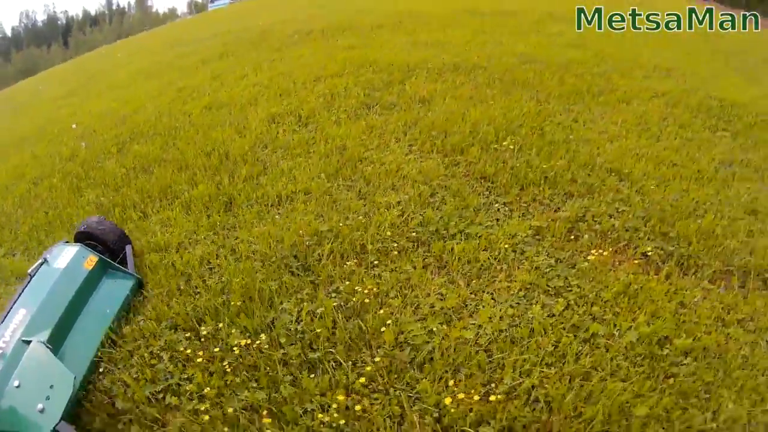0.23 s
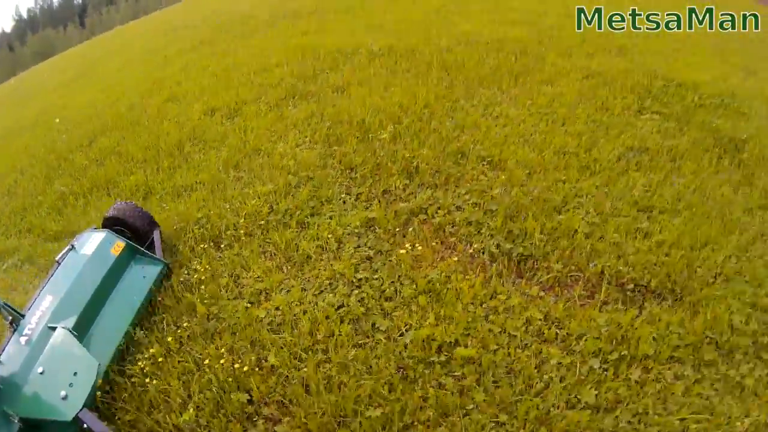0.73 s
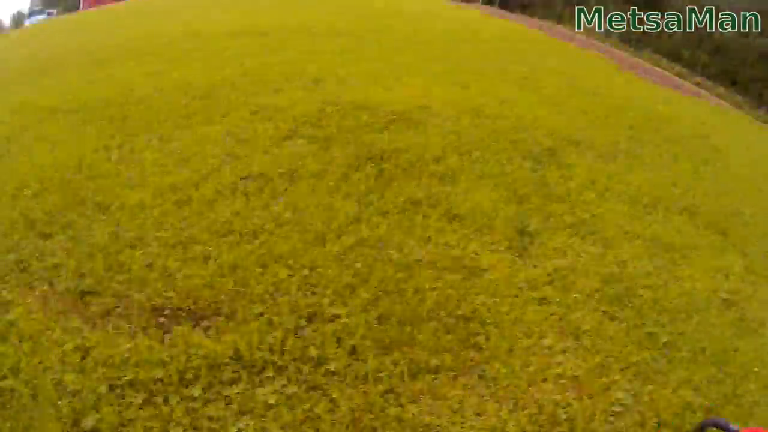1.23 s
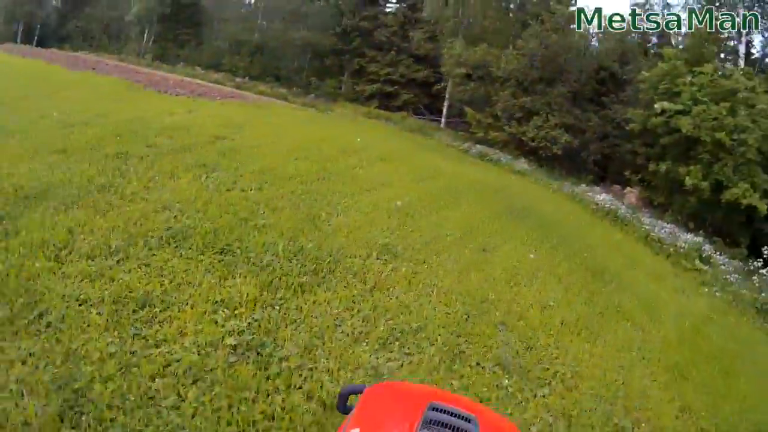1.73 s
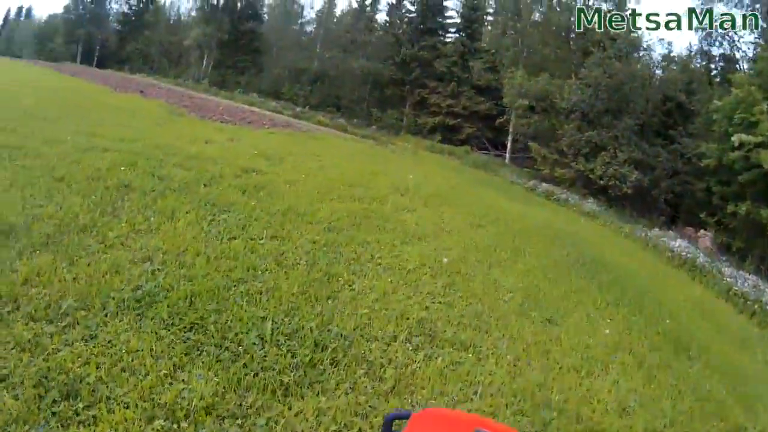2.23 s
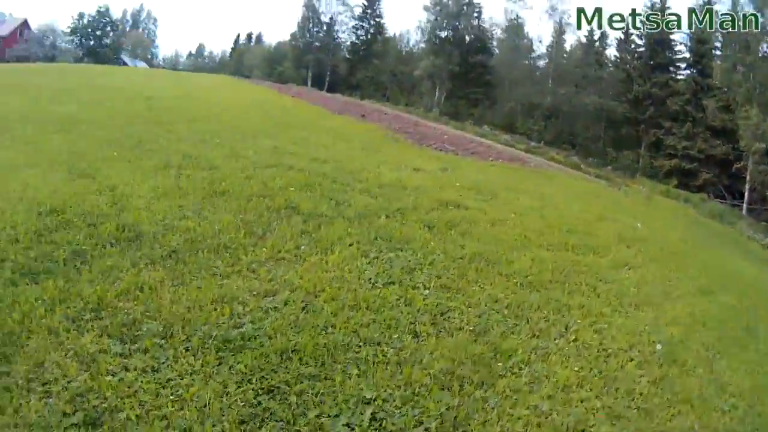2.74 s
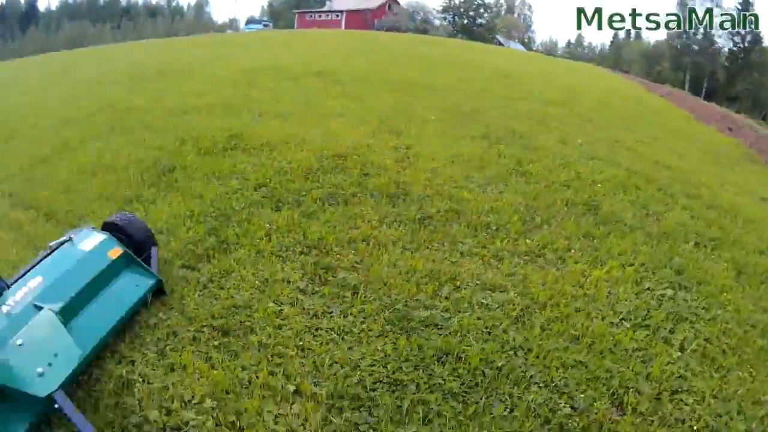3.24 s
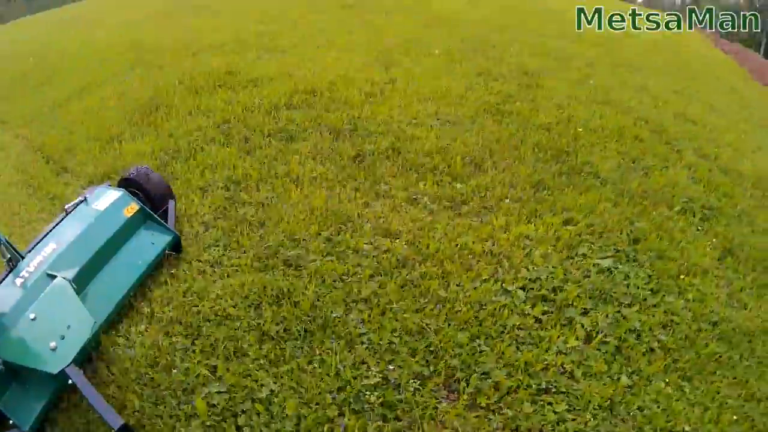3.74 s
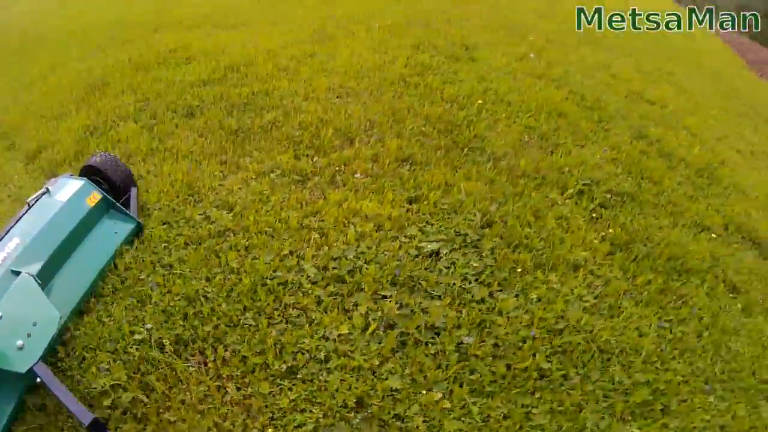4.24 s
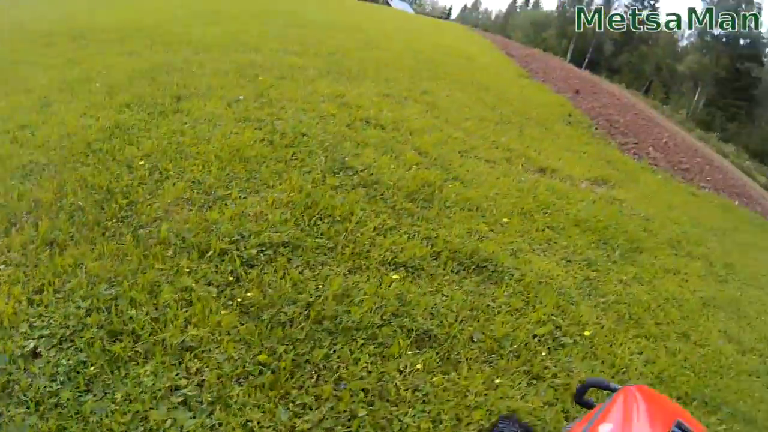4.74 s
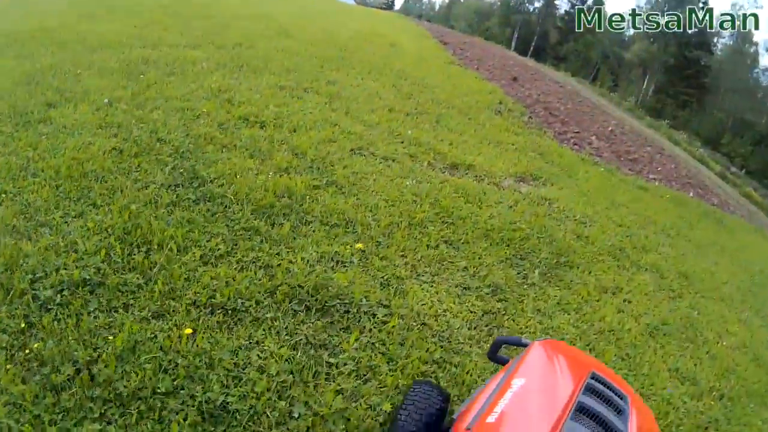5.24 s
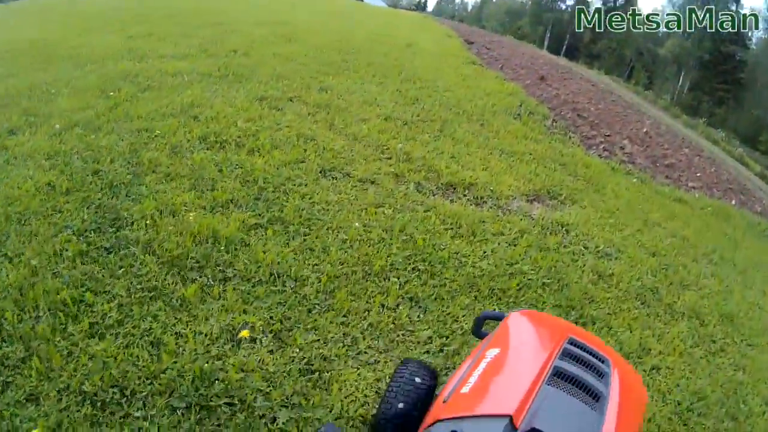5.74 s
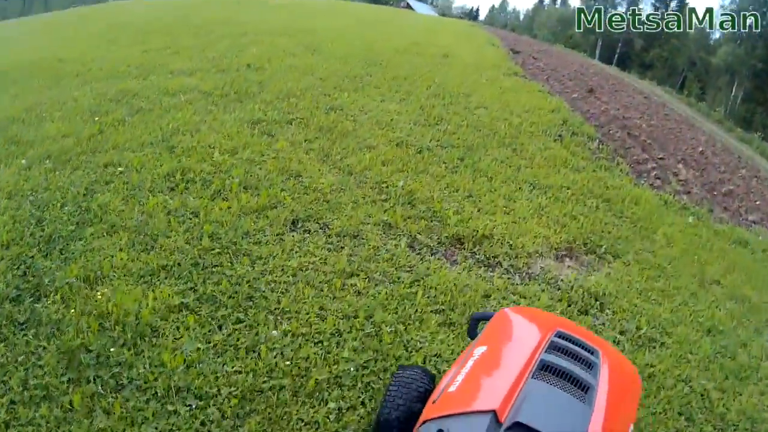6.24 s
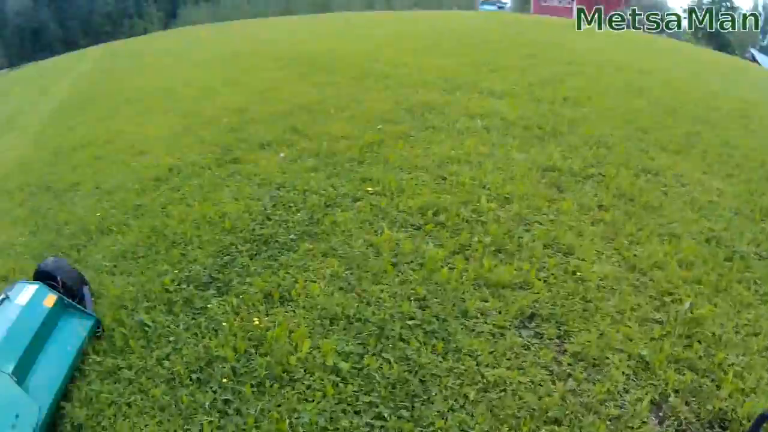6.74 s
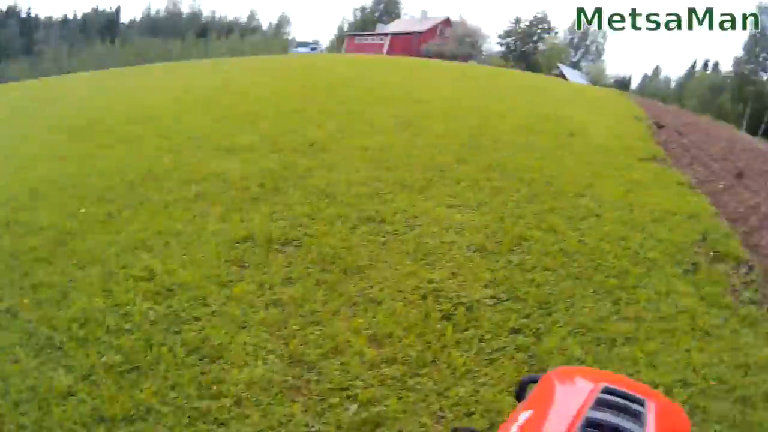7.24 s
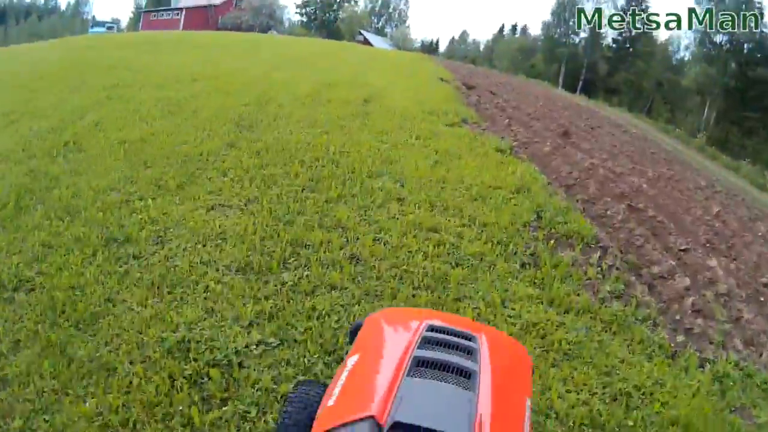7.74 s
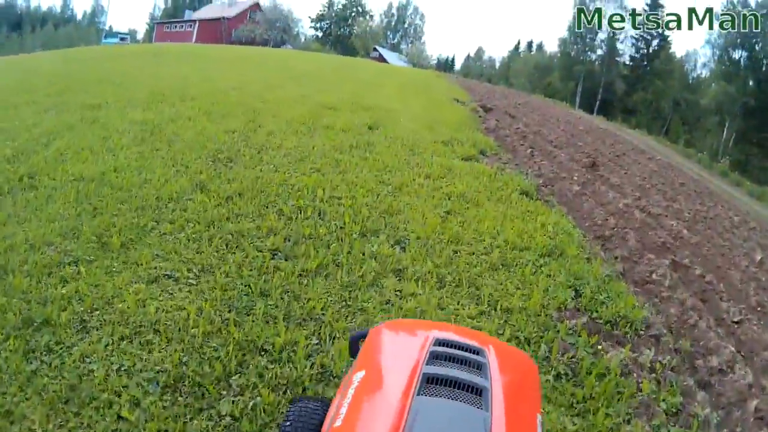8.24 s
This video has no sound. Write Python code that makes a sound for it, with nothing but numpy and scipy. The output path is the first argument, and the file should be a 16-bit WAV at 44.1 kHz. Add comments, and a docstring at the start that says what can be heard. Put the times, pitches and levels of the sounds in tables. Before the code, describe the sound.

Two small petrol engines drone loudly and evenly for about eight and a half seconds, heard close from the driver's seat in an open field with no echo. A one-cylinder lawn tractor gives a low, rapid chug. The towed flail mower adds a faster beat, a humming rotor and a rasp that rings its steel cover, with a light pulsing hiss on top. The rasp and hiss are clear at first, drop back around 1.5 seconds and build again from about 3 seconds. Between 4 and 6 seconds both engines sag very slightly in pitch, and the tractor chugs harder and pops as it labours. At about 5 seconds a thrown stalk makes one faint, high tick on the cover. The mower's rasp swells again near 7 seconds, then recedes while both engines keep running to the end.

```python
"""A field, where a one-cylinder lawn tractor tows a flail mower that has its own engine.
Each exhaust beats at its own firing rate; the tractor chugs harder and pops as it labours.
A belt spins the mower's humming rotor, its steel deck rings, and one thrown stalk ticks on it.
The mower's hiss comes and goes as the microphone on the driver's head turns towards it and away."""
import sys
import numpy as np
from scipy import signal
from scipy.fft import rfft, irfft
from scipy.io import wavfile

SR = 44100
rng = np.random.default_rng(int(sys.argv[2]) if len(sys.argv) > 2 else 0)


def wav_out(sig):
    """Save sig, one row per channel (or a flat mono array), as 16-bit PCM at SR to the path in sys.argv[1]."""
    wavfile.write(sys.argv[1], SR, np.round(np.clip(np.atleast_2d(sig).T, -1, 1) * 32767).astype(np.int16))


N = 373967

# How often each engine fires: time_s, rate_hz
TRACTOR_FIRING = [(0.0, 20.532), (0.3, 20.511), (0.7, 20.45), (1.38, 20.645), (1.72, 20.608), (2.0, 20.625),
                  (2.63, 20.445), (3.32, 20.68), (3.95, 20.372), (4.31, 20.325), (4.65, 20.342),
                  (5.2, 20.055), (5.5, 20.03), (6.2, 20.52), (6.92, 20.468), (7.38, 20.588), (7.77, 20.482),
                  (8.1, 20.585), (8.48, 20.647)]
MOWER_FIRING = [(0.0, 30.113), (0.4, 30.143), (1.0, 30.16), (1.3, 30.23), (1.85, 30.43), (2.95, 30.54),
                (3.3, 30.48), (4.1, 30.12), (4.75, 29.755), (5.48, 30.015), (6.12, 29.85), (6.4, 29.95),
                (6.8, 30.19), (7.05, 30.22), (7.52, 30.155), (7.9, 30.24), (8.48, 30.509)]
# The head's turn to the mower: time_s, facing (0 = away, about 1 = towards), rasp_db
HEAD_TURN = [(0.0, 0.92, -35), (.8, .9, -36), (1.3, 0.73, -35), (1.5, 0.04, -48), (1.8, 0.03, -46),
             (2.4, 0.23, -43.5), (3.0, 0.6, -37.5), (3.5, 0.83, -39.5), (4.3, 1.04, -34.5),
             (5.0, 0.8, -35.5), (5.6, 0.75, -38), (6.1, 0.5, -38.5), (6.55, 0.48, -39), (6.72, 0.87, -34.5),
             (7.2, .7, -33.5), (7.32, .3, -40), (7.6, 0.23, -43.5), (8.48, 0.34, -46)]


def gain_of(db):
    """Turns decibels into a number to multiply by."""
    return 10 ** (np.asarray(db) / 20)


def normalised(x):
    """Scales x to an average strength (rms) of 1."""
    return x / np.sqrt(np.mean(x ** 2))


def curves(table):
    """Joins a table's points over time, giving one curve per column after the first."""
    times_s, *values = np.transpose(table)
    return [np.interp(np.arange(N) / SR, times_s, v) for v in values]


def cycles_of(firing):
    """Counts an engine's firing cycles up to each sample."""
    return np.cumsum(curves(firing)[0]) / SR


def waver(hz):
    """A slow random wobble of strength about 1, no faster than about hz."""
    hop = 400  # samples per random step
    steps = rng.standard_normal(N // hop + 2)
    slow = signal.sosfiltfilt(signal.butter(2, hz, fs=SR / hop, output="sos"), steps)
    return np.interp(np.arange(N) / hop, np.arange(len(slow)), normalised(slow))


def coloured(x, colour):
    """Makes some pitches of x louder and others softer, then normalises it."""
    pitch_hz, level_db = np.transpose(colour)
    hz = np.fft.rfftfreq(N, 1 / SR)
    gain = gain_of(np.interp(np.log(hz + 1), np.log(pitch_hz), level_db, -90, -90))
    return normalised(irfft(rfft(x) * gain, N))


def ringing(x, rings):
    """Lets x ring around a few pitches, then normalises it."""
    hz = np.fft.rfftfreq(N, 1 / SR)
    gain = sum(gain_of(db) / (1 + 2j * (hz - pitch) / width) ** 2 for pitch, width, db in rings)
    return normalised(irfft(rfft(x) * gain, N))


def harmonics(cycles, tones, scatter, waver_db):
    """Tones at multiples of one beat; pipe echoes scatter their timing and no two strokes are alike."""
    out = np.zeros(N)
    for multiple, db in tones:
        slip = scatter * rng.standard_normal() + .0015 * multiple * waver(6)
        out += gain_of(db + waver_db * waver(3.3)) * np.cos(2 * np.pi * (multiple * cycles + slip))
    return np.sqrt(2) * out


def puffs(cycles, depth, rise, fall, uneven_db):
    """Noise that swells at each firing, each stroke with its own strength; rise and fall in cycles."""
    from_peak = cycles % 1 - .3
    shape = np.exp(-(from_peak / np.where(from_peak < 0, rise, fall)) ** 2)
    strengths = gain_of(uneven_db * rng.standard_normal(400))
    stroke = np.floor(cycles).astype(int) + 1
    return (1 + depth * strengths[stroke] * shape) * rng.standard_normal(N)


def gain_at_ear(base_db, facing_db, load_db):
    """A gain that changes as the head faces the mower and as thick grass slows its engine."""
    free_hz, full_load_drop_hz = 30.53, .76
    load = (free_hz - curves(MOWER_FIRING)[0]) / full_load_drop_hz
    return gain_of(base_db + facing_db * curves(HEAD_TURN)[0] + load_db * load)


def tractor_drone(cycles):
    """The tractor's exhaust and shaft tones. A hum near 246 Hz grows louder and softer."""
    # The steadier tones: multiple, level_db
    tones = [(1, -48), (2, -38.5), (5, -31.5), (6, -36), (7, -39), (9, -36.5), (10, -35), (11, -29.5),
             (13, -37.5), (14, -44.5), (15, -41.5), (16, -33), (20, -41.5), (21, -41), (22, -46), (23, -46)]
    # Loudness over time: time_s, shift_db (from 4th harmonic to 8th), hum_db, others_gain_db
    loudness = [(0.0, -3, -22.5, -3), (.9, 4.5, -21.5, -3), (1.4, 3.5, -28.5, 0.5), (2.0, 0, -27, 2.5),
                (2.6, 0, -28.5, -1), (3.3, -5.5, -39, -1.5), (4.0, -5.5, -27, 1.5), (4.7, -3, -26, 0.5),
                (5.4, 4.5, -19.5, 2.5), (6.2, 2.5, -26.5, 0.5), (6.7, 0.5, -20.5, 2), (7.3, -6, -24.5, 2.5),
                (7.9, -1.5, -21, 2.5), (8.48, -3, -37, 1.5)]
    shift_db, hum_db, others_gain_db = curves(loudness)
    drone = gain_of(others_gain_db) * harmonics(cycles, tones, scatter=.12, waver_db=2)
    changing = [(4, -37 - shift_db), (8, -27.5 + shift_db), (12, hum_db)]
    return drone + harmonics(cycles, changing, scatter=.15, waver_db=1.5)


def pipe_pops(cycles, labour_hz):
    """Under labour each firing pops in the pipe, a short ring at 23 times the firing rate."""
    from_peak = cycles % 1 - .5
    shape = np.exp(-(from_peak / .099) ** 2)
    return gain_of(-8.5) * labour_hz * shape * np.cos(2 * np.pi * 23 * from_peak)


def tractor_chug(cycles, labour_hz):
    """The muffler roars and the block clatters at each firing; labour deepens the roar's puffs."""
    # Tone colours of muffler and engine block: pitch_hz, level_db
    roar_colour = [(20, -35), (70, -12.5), (130, -7), (210, -0.5), (280, -3.5), (420, -1.5), (600, -6),
                   (800, -9.5), (1000, -12), (1450, -13.5), (1700, -20), (2000, -23), (2700, -36.5),
                   (3500, -49.5)]
    clatter_colour = [(1500, -7.5), (2700, -1), (3500, -1.5), (5000, -14.5), (5450, -9), (5900, -18.5),
                      (6800, -22), (8300, -21), (10000, -28.5), (12000, -24), (13600, -41)]
    roar = puffs(cycles, depth=.36 + .3 * labour_hz, rise=.041, fall=.28, uneven_db=1.5)
    clatter = puffs(cycles, depth=.48, rise=.05, fall=.2, uneven_db=2)
    chug = coloured(roar, roar_colour) + gain_of(-30) * coloured(clatter, clatter_colour)
    flutter = gain_of(.64 * waver(30))
    return gain_at_ear(base_db=-20.5, facing_db=1.33, load_db=1.8) * flutter * chug


def mower_drone(cycles):
    """The mower's exhaust tones and the hum of its rotor, growing louder and softer."""
    # Lower and upper exhaust tones: multiple, level_db
    low_tones = [(1, -42), (2, -33), (3, -49), (4, -34.5), (5, -34), (6, -46), (7, -50), (8, -36),
                 (9, -36.5), (12, -43.5), (14, -33), (15, -40.5), (17, -50), (18, -39.5)]
    upper_tones = [(10, -32.5), (11, -28.5), (13, -30)]
    # Loudness over time: time_s, flails_db, upper_gain_db, nineteenth_db
    loudness = [(0.0, -21.5, -1, -39), (.5, -25, 1.5, -26.5), (1.0, -23, 2, -33), (1.5, -22, -2, -38),
                (2.4, -31, -10, -38), (3.2, -27.5, -2, -43), (3.5, -24, 1.5, -29.5), (4.1, -20, 1, -28.5),
                (4.6, -20, 3.5, -37), (5.1, -24.5, -6, -46), (5.8, -20, -7, -32.5), (6.6, -23.5, 1.5, -35),
                (7.3, -23.5, 1, -39), (7.8, -23.5, -5.5, -33), (8.48, -21.5, -3, -35.5)]
    flails_db, upper_gain_db, nineteenth_db = curves(loudness)
    low = harmonics(cycles - .16, low_tones, scatter=.11, waver_db=.9)
    low *= gain_at_ear(base_db=-1.66, facing_db=3.55, load_db=-1)
    upper = gain_of(upper_gain_db) * harmonics(cycles - .16, upper_tones, scatter=.076, waver_db=2)
    top = harmonics(cycles, [(19, nineteenth_db)], scatter=0, waver_db=1)
    return low + upper + top + flail_rotor(flails_db)


def flail_rotor(flails_db):
    """Four rows of flails hum at four times the spin, which sags with the engine as the belt slips."""
    # The rotor's other tones: multiple, level_db
    tones = [(1, -48), (2, -36.5), (8, -45.5)]
    spin_hz = 50.03 + 2.1 * (curves(MOWER_FIRING)[0] - 30.13)
    return harmonics(np.cumsum(spin_hz) / SR, tones + [(4, flails_db)], scatter=.372, waver_db=1.5)


def mower_rasp(cycles):
    """Each firing gives a rasping blast that rings the mower's sheet-steel cover, the deck."""
    # Tone colour of the blasts: pitch_hz, level_db
    colour = [(900, -11.5), (1400, 4.5), (1900, -4), (2300, -5.5), (2650, -1.5), (3100, -12), (3800, -25)]
    # Where the deck rings: pitch_hz, width_hz, level_db
    deck_rings = [(1186, 53, 7.5), (1446, 77, 3.5), (2524, 75, -17), (2775, 77, -13), (4630, 90, -27.5)]
    blasts = puffs(cycles, depth=.71, rise=.18, fall=.23, uneven_db=2.2)
    rasp = coloured(blasts, colour) + gain_of(-5) * ringing(blasts, deck_rings)
    return gain_of(curves(HEAD_TURN)[1]) * rasp


def mower_hiss(cycles):
    """A hiss pulses with each firing, and one band of it swells once."""
    # Tone colour of the hiss: pitch_hz, level_db
    colour = [(2500, -8), (3300, -8.5), (3900, 2), (4450, 0.5), (5000, -3), (5800, -3), (6800, -11.5),
              (7500, -3.5), (8700, -5), (9600, -12.5), (10500, -20.5), (13000, -33)]
    # The band that swells: pitch_hz, width_hz, level_db
    band = [(4600, 1600, 0)]
    direct = np.clip(.25 + 1.4 * curves(HEAD_TURN)[0], .1, 1)  # turned away, detours blur the beat
    gusts = puffs(cycles, depth=.69 * direct, rise=.16, fall=.17, uneven_db=2.5)
    hiss = gain_at_ear(base_db=-60, facing_db=11, load_db=.1) * coloured(gusts, colour)
    peak_s, half_length_s = 4, .5
    swell = np.exp(-((np.arange(N) / SR - peak_s) / half_length_s) ** 2)
    return hiss + gain_of(-59) * swell * ringing(gusts, band)


def valve_sizzle(cycles):
    """The mower's valves sizzle at each firing; the louder they come, the sharper they tick."""
    # Tone colour of the valves: pitch_hz, level_db
    colour = [(9000, -21), (10500, 0.5), (12000, 1.5), (12800, -2.5), (13600, -14)]
    # Their loudness: time_s, level_db
    loudness = [(0.0, -66.5), (1.3, -68), (1.6, -69.5), (2.3, -69.5), (2.9, -68), (4.2, -67.5),
                (4.7, -65.3), (5.6, -66.5), (6.15, -66.5), (6.45, -66), (7.25, -67), (7.55, -70),
                (8.48, -70)]
    level_db = curves(loudness)[0]
    sharpness = np.clip((level_db + 70.5) / 6.5, .1, 1)
    ticking = puffs(cycles, depth=2.6 * sharpness, rise=.12, fall=.17, uneven_db=1.5)
    return gain_of(level_db) * coloured(ticking, colour)


def stalk_tick():
    """A thrown bit of stalk hits the deck, which rings very briefly."""
    # The hit: start_s, level_db, pitch_hz, fade_s (time to fall by 60 dB)
    hits = [(4.963, -38, 5900, .02)]
    out, t = np.zeros(N), np.arange(2000) / SR
    for start_s, level_db, pitch_hz, fade_s in hits:
        ring = gain_of(level_db - 60 * t / fade_s) * np.sin(2 * np.pi * pitch_hz * t)
        out[round(start_s * SR):][:len(t)] += ring
    return out


def scene():
    """Both machines in the open air, in one channel."""
    beat = cycles_of(TRACTOR_FIRING)  # taking a fraction off delays a sound within each cycle
    labour_hz = np.maximum(20.6 - curves(TRACTOR_FIRING)[0], 0)  # drop below the easy firing rate
    tractor = tractor_drone(beat - .96) + pipe_pops(beat - .4, labour_hz)
    tractor += tractor_chug(beat - .46, labour_hz)
    mower_beat = cycles_of(MOWER_FIRING)
    drone = mower_drone(mower_beat)
    puff_beat = mower_beat - .68
    noise = mower_rasp(puff_beat) + mower_hiss(puff_beat) + valve_sizzle(puff_beat)
    grass = gain_of(.36 * waver(7.2))  # the grass comes thick and thin
    return (tractor + drone + grass * noise + stalk_tick())[None]


def record(dry):
    """The loudest peaks are gently rounded off; the ends fade and the highest treble is cut."""
    from_end = np.minimum(np.arange(N), np.arange(N)[::-1])
    soft = 2 * np.tanh(dry / 2) * np.clip(from_end / 90, 0, 1)
    top_hz = 13700
    treble_cut = signal.firwin(511, top_hz, window=("kaiser", 9), fs=SR)
    return signal.oaconvolve(soft, treble_cut[None], "same")


dry = scene()
out = record(dry)
wav_out(out)
```